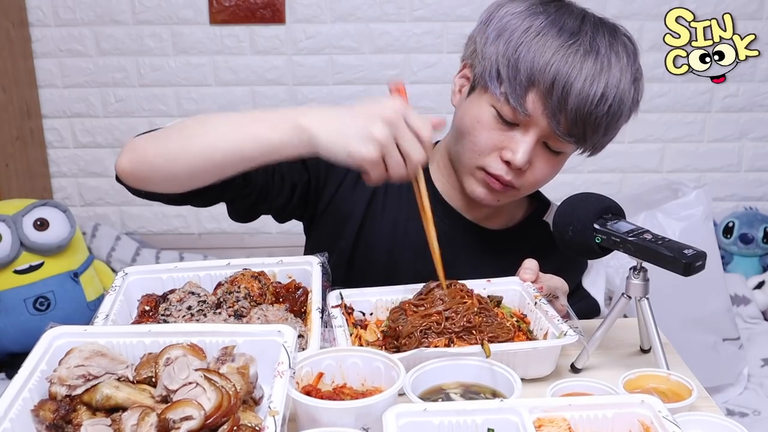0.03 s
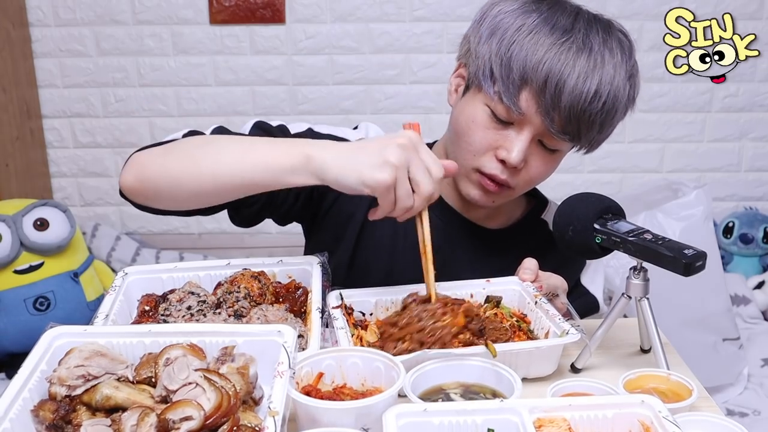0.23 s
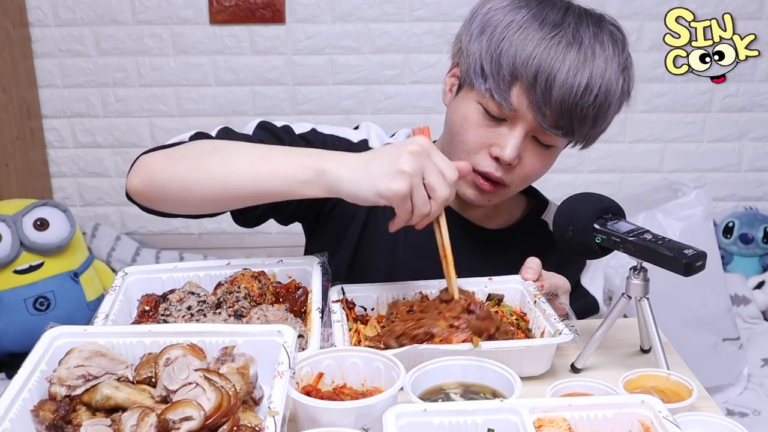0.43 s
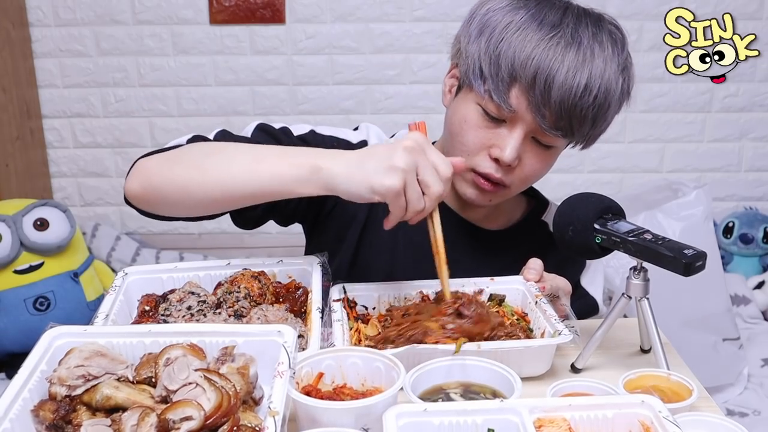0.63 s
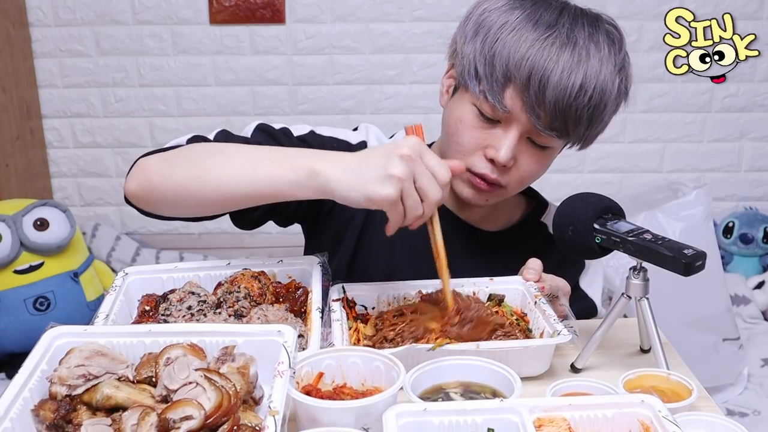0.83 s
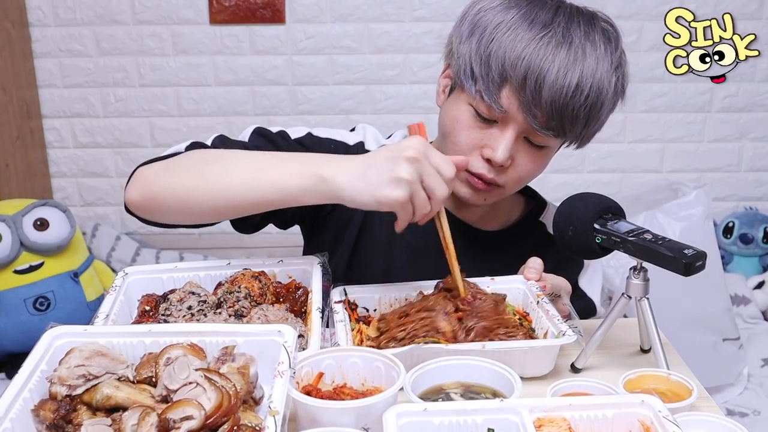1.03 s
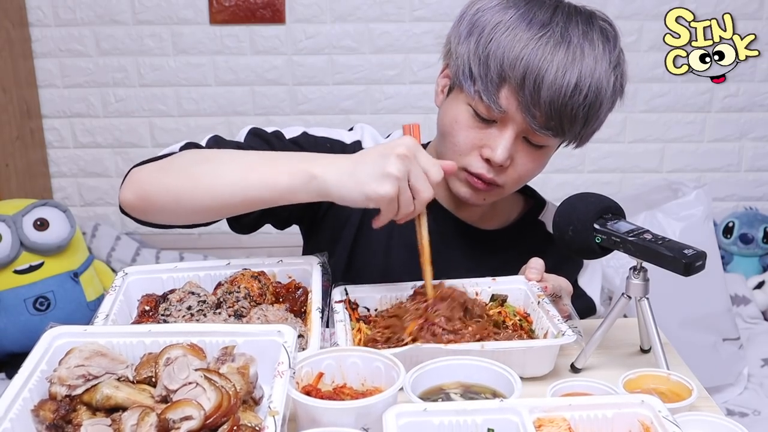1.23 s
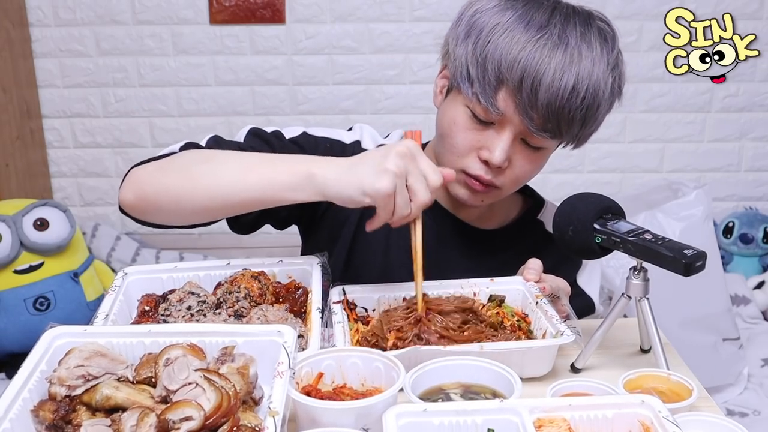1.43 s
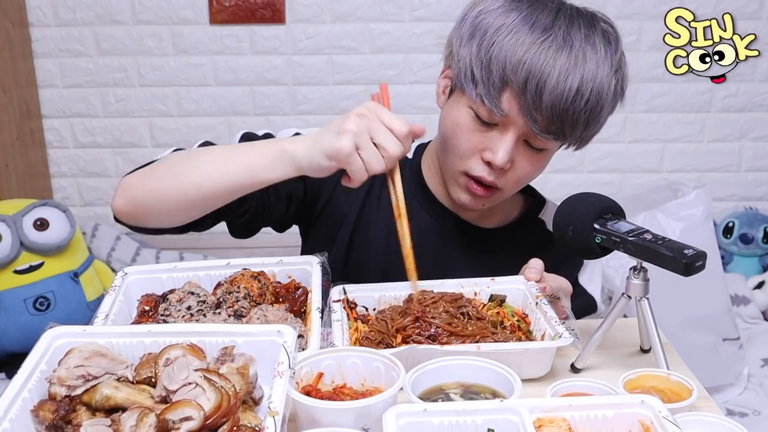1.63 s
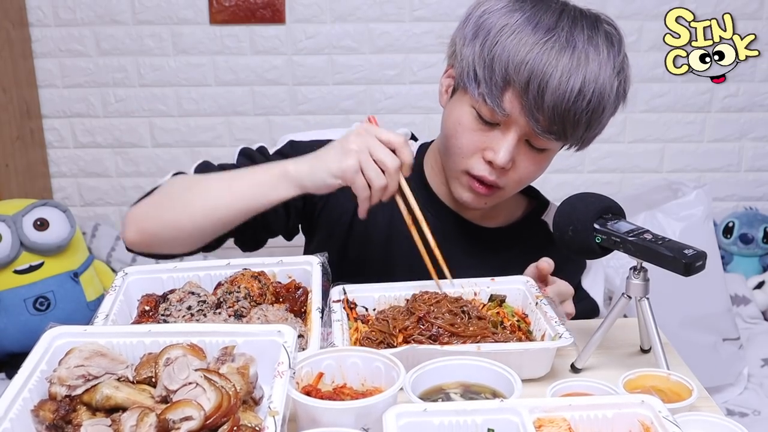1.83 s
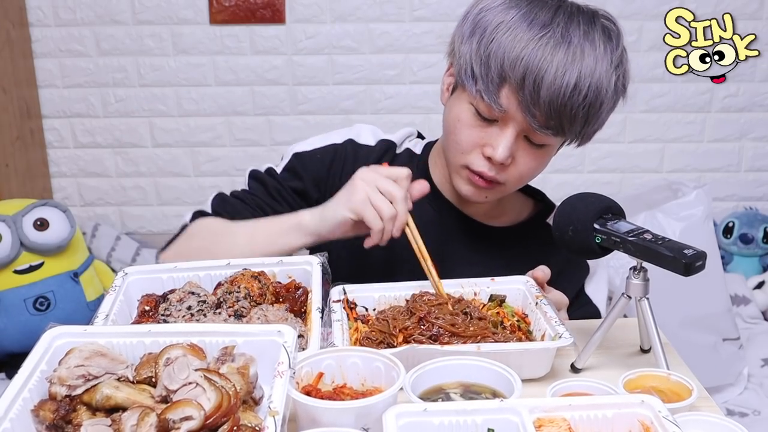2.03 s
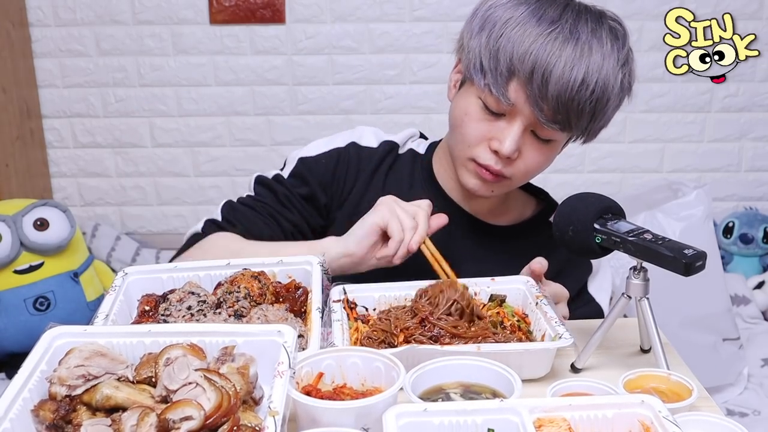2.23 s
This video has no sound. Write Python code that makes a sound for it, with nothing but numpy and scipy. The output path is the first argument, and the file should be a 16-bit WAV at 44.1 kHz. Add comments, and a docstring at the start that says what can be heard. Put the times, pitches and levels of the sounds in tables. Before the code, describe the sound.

Chopsticks stir sauced noodles with wet squelches and crackles, then click against a plastic tray.

```python
"""Chopsticks stirring sauced noodles

A thin plastic tray, close to a stereo microphone in a quiet room. Sauce films crackle, pop and
squelch as the strands part, in swarms of tiny chirping bursts. Pushes thud through the table and
rock the microphone stand, and the tray floor flexes with a hollow knock. Near the end the
chopsticks click against each other and the tray."""
import sys
import numpy as np
from scipy import signal
from scipy.fft import rfft, irfft, next_fast_len
from scipy.io import wavfile
from scipy.ndimage import map_coordinates

SR = 44100
rng = np.random.default_rng(int(sys.argv[2]) if len(sys.argv) > 2 else 0)


def wav_out(sig):
    """Save sig, one row per channel (or a flat mono array), as 16-bit PCM at SR to the path in sys.argv[1]."""
    wavfile.write(sys.argv[1], SR, np.round(np.clip(np.atleast_2d(sig).T, -1, 1) * 32767).astype(np.int16))


N = 101429
LEFT_LAG_S = 3e-5  # the tray's sound reaches the left capsule this much later


def amp(db):
    """Decibels to gain."""
    return 10 ** (np.asarray(db) / 20)


def unit(x):
    """Scale to rms 1."""
    return x / np.sqrt(np.mean(x ** 2) + 1e-20)


def along(points, hz):
    """Read (f/Hz, value) points on a log frequency axis."""
    f, v = np.transpose(points)
    return np.interp(np.log(hz + 1), np.log(f + 1), v)


def curves(rows):
    """One envelope for each column after the time."""
    times, *columns = np.transpose(rows)
    return [np.interp(np.arange(N) / SR, times, column) for column in columns]


def wobble(rate):
    """A smooth random curve, rate knots a second."""
    return map_coordinates(rng.standard_normal(2000), [np.arange(N) * rate / SR], mode="wrap")


def filtered(x, response):
    """Filter x by a response given as a function of frequency."""
    n = x.shape[-1]
    size = next_fast_len(n + 4096)
    return irfft(rfft(x, size) * response(np.fft.rfftfreq(size, 1 / SR)), size)[..., :n]


def bell(f, centre_hz, octaves):
    """A bell-shaped band around one pitch."""
    return np.exp(-.5 * (np.log2((f + 1) / centre_hz) / octaves) ** 2)


def coloured(x, eq):
    """x through an EQ curve, at rms 1."""
    return unit(filtered(x, lambda hz: amp(along(eq, hz))))


def noise(width):
    """White stereo noise; width is side over middle."""
    mid, side = rng.standard_normal((2, N))
    return unit(np.array([mid + width * side, mid - width * side]))


def panned(x, pan_db):
    """Left louder than right by pan_db."""
    return x * amp(np.array([[.5], [-.5]]) * pan_db)


def add(track, s, sound):
    """Mix a sound into the track at time s."""
    part = track[..., max(round(s * SR), 0):][..., :sound.shape[-1]]
    part += sound[..., :part.shape[-1]]


def attack(t, rise_s):
    """Exponential rise to 1."""
    return 1 - np.exp(-t / rise_s)


def fade(t, t60):
    """Exponential decay, 60 dB down at t60."""
    return np.exp(-np.log(1000) * t / t60)


def ring(modes, t):
    """Damped sines from (f/Hz, level/dB, t60/s) rows, balanced a little differently each time."""
    return sum(amp(db + rng.normal(0, 1)) * fade(t, t60) * np.sin(2 * np.pi * hz * t)
               for hz, db, t60 in modes)


def room_tone():
    """The quiet room's steady, wide bed of noise."""
    # room tone EQ: f/Hz, gain/dB
    bed_eq = [(20, 29.5), (100, -15), (200, -18), (500, 4.5), (1500, -9), (5000, -43), (10000, -60),
              (16000, -56)]
    return amp(-60.5) * coloured(noise(width=1.0), bed_eq)


def reverb(x):
    """The room's diffuse tail, different in each channel."""
    # room decay: f/Hz, t60/s
    decay = [(150, 0.45), (1000, 0.14), (5000, 0.3), (9000, 0.074), (16000, 0.36)]
    # tail EQ: f/Hz, gain/dB
    tail_eq = [(100, 9.5), (700, -6.5), (1400, 9), (5000, -8), (8000, -7), (14000, -18)]
    hz, t, spectrum = signal.stft(rng.standard_normal((2, SR // 2)), SR, nperseg=256)
    tail = signal.istft(spectrum * fade(t, along(decay, hz)[:, None]), SR, nperseg=256)[1]
    impulse = np.pad(tail, ((0, 0), (150, 0))) / np.linalg.norm(tail[0])  # 3.4 ms pre-delay
    wet = signal.fftconvolve(x, impulse, axes=1)[:, :N]
    return filtered(wet, lambda f: amp(along(tail_eq, f)))


def table_and_stand():
    """Pushes and drags shake the table; the rocking stand moves the capsules in opposite senses."""
    # pushes: t/s, relative thud level/dB, relative rocking level/dB, thud f/Hz
    pushes = [(0.405, -44, -31, 67.6), (.464, -36, -50, 96.5), (0.513, -35.5, -37, 88.7),
              (0.616, -50, -49, 100), (0.653, -47.5, -31.5, 96), (.755, -42.5, -31, 91),
              (0.961, -44.5, -31, 76), (1.05, -45.5, -46, 93.6), (1.167, -42, -30, 86.3),
              (1.238, -35.5, -23, 78.7), (1.381, -27.5, -24.5, 76), (1.465, -41.5, -27, 85.7),
              (1.494, -41, -30, 76), (1.63, -31.5, -29, 72.8), (1.712, -34, -31, 78.8),
              (1.873, -43, -39, 86.7), (2.273, -50.5, -40.5, 91.6)]
    # table top modes: multiple of the thud's pitch, level/dB, t60/s
    top_modes = [(1.002, 5.5, 0.13), (2.2, -4.5, 0.07)]
    # microphone stand modes: f/Hz, level/dB, t60/s
    stand_modes = [(46, 5, 0.1), (65.7, 10, 0.31), (440, 4, 0.032)]
    # chopsticks dragging on the tray floor: t/s, relative level/dB
    drag = [(0.0, -51), (0.11, -74.5), (0.2, -51.5), (0.38, -52), (0.49, -41), (0.57, -48), (1.13, -46.5),
            (1.25, -37.5), (1.3, -52.5), (1.39, -39.5), (1.45, -49), (1.48, -39), (1.58, -53.5),
            (1.62, -46), (1.82, -55), (2.08, -61), (2.19, -69.5), (2.3, -67)]
    # drag rumble EQ: f/Hz, gain/dB
    rumble_eq = [(15, 0.5), (45, -5), (65, -3.5), (100, 5.5), (145, -6.5), (185, -15), (260, -24),
                 (500, -36), (2000, -89)]
    sway_eq = [(15, -31), (48, -10), (66, 16), (88, -18), (600, -91)]  # stand resonance: f/Hz, gain/dB
    thud, rock, t = np.zeros(N), np.zeros(N), np.arange(SR // 2) / SR
    soft_onset = 1 - np.exp(-(t / 0.011) ** 2)
    for s, thud_db, rock_db, hz in pushes:
        modes = [(hz * multiple, db, t60) for multiple, db, t60 in top_modes]
        add(thud, s, amp(thud_db) * ring(modes, t) * attack(t, 0.0054))
        add(rock, s, amp(rock_db - 6.5) * ring(stand_modes, t) * soft_onset)
    drag_db, = curves(drag)
    rumble = amp(drag_db - 1.5) * coloured(noise(width=0.37), rumble_eq)
    rock += amp(drag_db + 4.0) * coloured(rng.standard_normal(N), sway_eq)
    return rumble + np.array([thud + rock, thud - rock])


def tray_flexes():
    """The thin tray floor gives way under the chopsticks with a dull, hollow knock."""
    # flexes: t/s, peak/dB
    knocks = [(0.679, -40.5), (.708, -45), (0.961, -54), (1.1606, -33), (1.229, -40), (1.383, -43.5),
              (1.858, -41.5), (1.869, -49), (1.956, -46.5), (2.079, -53)]
    # tray floor modes: f/Hz, level/dB, t60/s
    floor_modes = [(192, 4.5, 0.029), (349, 4.5, 0.022), (502, 3.5, 0.022), (830, -7, 0.023),
                   (1030, 4, 0.013)]
    out, t = np.zeros(N), np.arange(4096) / SR
    for s, db in knocks:
        knock = ring(floor_modes, t) * attack(t, 0.0089)
        add(out, s, amp(db) * knock / np.abs(knock).max())
    return out


def chopstick_clicks():
    """Each contact is a crack of noise and a brief ring of sticks and tray, with its own bright band."""
    # contacts: t/s, peak/dB, brightest f/Hz, t60/s
    clicks = [(1.8343, -40.5, 2920, 0.006), (1.8441, -24, 7600, 0.007), (1.8581, -39.5, 1320, 0.0095),
              (1.8608, -45, 8900, 0.016), (1.8737, -25, 4000, 0.0039), (1.8903, -32, 7500, 0.0038),
              (1.9405, -43, 2920, 0.011), (1.971, -39, 4430, 0.0038), (1.977, -34.5, 2670, 0.011),
              (1.9823, -24.5, 4900, 0.0045), (1.9847, -31.5, 1900, 0.011), (2.0011, -26.5, 1640, 0.0034),
              (2.0017, -16.5, 4680, 0.011), (2.0035, -22, 1420, 0.0069), (2.0178, -17, 6600, 0.0076)]
    # chopstick and tray modes: f/Hz, level/dB, multiple of the click's t60
    modes = [(1357, 2, 2.4), (1730, 4, 1.2), (2530, 10.5, 1.1), (3100, 8, 0.58), (4790, 17.5, 0.41),
             (5220, 17.5, 0.56), (12500, 2, 0.6)]
    low_cut_hz, skirt_db = 1000, -6
    out, t = np.zeros(N), np.arange(2048) / SR
    for s, db, bright_hz, t60 in clicks:
        def contact(f):
            """A bright peak on a broad skirt, with the lows cut."""
            skirt = amp(skirt_db) / (1 + (f / (2.54 * bright_hz)) ** 4)
            return (skirt + bell(f, bright_hz, octaves=0.28)) / (1 + (low_cut_hz / (f + 1)) ** 6)

        struck = [(hz, level + 20 * np.log10(contact(hz)), t60 * life) for hz, level, life in modes]
        tone = ring(struck, t)
        crack = filtered(rng.standard_normal(len(t)), contact) * fade(t, t60)
        click = (unit(tone) + unit(crack)) * attack(t, 0.00015)
        add(out, s, amp(db) * click / np.abs(click).max())
    return panned(out, pan_db=-4)


def sauce_pops():
    """A larger film tears with a snap and its pocket of air rings for a few cycles."""
    # bursting bubbles: t/s, peak/dB, f/Hz
    pops = [(.016, -46.5, 5470), (0.071, -59, 4630), (.153, -47, 6640), (.174, -55, 3340),
            (.234, -41.5, 5830), (.272, -40.5, 1860), (0.314, -41, 2200), (0.38, -38, 3240),
            (0.404, -37, 5900), (0.4472, -37.5, 1620), (.476, -34, 10700), (0.546, -36.5, 2300),
            (.622, -42, 1360), (.629, -41, 12000), (.642, -32.5, 7000), (.758, -37.5, 2130),
            (0.831, -38.5, 4400), (.848, -32, 4860), (0.8695, -34.5, 5570), (.898, -30, 5760),
            (0.9125, -36.5, 1435), (.9208, -33.5, 4500), (.938, -32.5, 6260), (0.975, -44, 3700),
            (0.989, -34.5, 2480), (1.054, -38.5, 5800), (1.0875, -34.5, 6020), (1.16, -36.5, 1500),
            (1.204, -35.5, 7350), (1.227, -37.5, 4000), (1.38, -30, 6350), (1.345, -41.5, 1760),
            (1.44, -39, 1540), (1.526, -39, 2040), (1.55, -33, 9300), (1.594, -42, 11000),
            (1.63, -32.5, 11800), (1.662, -31.5, 4880), (1.716, -37, 13000), (1.723, -55, 4500),
            (1.759, -51.5, 2180), (1.763, -40, 9200), (2.078, -42.5, 1220), (2.093, -46.5, 1330),
            (2.121, -38, 9000), (2.155, -43, 9400)]
    ring_cycles, snap_t60 = 11, 0.0083
    out, t = np.zeros(N), np.arange(2048) / SR
    for s, db, hz in pops:
        hiss = filtered(rng.standard_normal(len(t)), lambda f: bell(f, hz, octaves=0.47) + .08)
        snap = unit(hiss) * fade(t, snap_t60)
        pocket = ring([(hz, 0, ring_cycles / hz)], t)
        pop = (pocket + 0.28 * snap) * attack(t, 0.000092)
        add(out, s, amp(db) * pop / np.abs(pop).max())
    return panned(out, pan_db=1.5)


def bubbles(lo_hz, hi_hz, cycles, spread_db, rise, scatter, count, samples):
    """Tiny bursts in the sauce: rising chirps that swell and die, each from its own place in the tray."""
    when, pitch, life = rng.random((3, count, 1))
    strength, pan, lag = rng.standard_normal((3, count, 1))
    hz = (np.sqrt(lo_hz) + pitch * (np.sqrt(hi_hz) - np.sqrt(lo_hz))) ** 2
    t60 = cycles * (.5 + life) / hz
    gain = amp(spread_db * np.minimum(strength, 2)) * hz ** 1.36
    index = ((when * N).astype(int) + np.arange(samples)).ravel()
    out = []
    for side in (-.5, .5):
        # scatter spreads the arrival times between the capsules
        t = np.maximum(np.arange(samples) / SR + side * lag * scatter * LEFT_LAG_S, 0)
        swell = attack(t, 1 / hz) * fade(t, t60)
        chirp = np.sin(2 * np.pi * hz * t * (1 + rise * np.minimum(t / t60, 1)))
        burst = gain * amp(side * pan * 7.3) * swell * chirp
        out.append(np.bincount(index, burst.ravel(), N + samples)[:N])
    return unit(np.array(out))


def sauce_squishes():
    """Sauce squeezed between strands: a dense froth that swells and sinks around one pitch."""
    # squishes: t/s, length/s, level/dB, f/Hz
    squishes = [(0.395, 0.022, -58.5, 5600), (0.442, 0.097, -54, 1250), (0.52, 0.038, -54, 5600),
                (0.905, 0.04, -54, 5100)]
    out, t = np.zeros((2, N)), np.arange(N) / SR
    for s, length, db, hz in squishes:
        froth = bubbles(hz / 2, hz * 2, cycles=17, spread_db=2.5, rise=0.04, scatter=0.2,
                        count=2500, samples=400)
        froth = filtered(froth, lambda f: bell(f, hz, octaves=0.27))
        swell = np.sin(np.pi * np.clip((t - s) / length, 0, 1))
        out += amp(db) * unit(froth) * swell
    return out


def noodles():
    """Parting strands fizz, crackle and squelch in clumps over a low churn: bursts in a wet smear."""
    # stirring envelopes, trimmed per layer below: t/s, fizz/dB, crackle/dB, squelch/dB, churn/dB
    stir = [(0.0, -75.5, -84, -73, -78), (0.08, -79, -73, -75, -60.5), (0.12, -89, -87.5, -84.5, -76),
            (0.2, -68.5, -65.5, -64, -70.5), (0.255, -67.5, -64, -62.5, -65),
            (0.29, -63.5, -53.5, -58, -65), (0.35, -68.5, -61.5, -63.5, -68),
            (0.41, -62.5, -54.5, -59, -61), (0.49, -61.5, -58.5, -53.5, -49),
            (0.58, -62, -59.5, -64.5, -63.5), (0.67, -59.5, -56.5, -58, -60),
            (0.75, -63.5, -57, -61.5, -59.5), (0.81, -65, -62.5, -58.5, -62),
            (0.88, -70, -63.5, -63.5, -64.5), (0.93, -56.5, -55.5, -62.5, -60.5),
            (1.03, -64.5, -61.5, -57.5, -57), (1.11, -64, -60.5, -58, -62.5),
            (1.17, -57.5, -51.5, -60, -46.5), (1.24, -61, -55.5, -55.5, -66), (1.28, -66, -57.5, -64, -56),
            (1.35, -63.5, -56.5, -61, -66), (1.43, -57, -53, -60.5, -51),
            (1.53, -64.5, -56.5, -56.5, -50.5), (1.6, -71, -58, -58.5, -64.5), (1.67, -61, -54.5, -62, -57),
            (1.72, -68.5, -69.5, -70.5, -63), (1.81, -84.5, -71, -71.5, -70.5),
            (1.87, -71, -66, -67, -55.5), (1.93, -74, -72.5, -69.5, -69), (2.04, -60.5, -59, -73, -64.5),
            (2.1, -76, -63.5, -66.5, -57.5), (2.14, -74, -64, -72, -70), (2.19, -85, -85, -85, -87),
            (2.24, -81.5, -76, -79.5, -69.5), (2.3, -70, -66.5, -68, -70)]
    # airy fizz EQ: f/Hz, gain/dB
    fizz_eq = [(4000, -2.5), (7300, -3), (9000, 1.5), (12000, -4.5), (14000, -10.5), (16000, -18.5)]
    # crisp crackle EQ: f/Hz, gain/dB
    crackle_eq = [(1500, -6.5), (2600, -3), (3600, -6), (5200, -3.5), (6800, -9), (9000, -12.5),
                  (16000, -64)]
    # midrange squelch EQ: f/Hz, gain/dB
    squelch_eq = [(200, -60), (450, -1.5), (800, 2), (1400, -0.5), (2100, 0.5), (2700, -9), (4200, -7),
                  (12000, -79)]
    # low churn EQ: f/Hz, gain/dB
    churn_eq = [(40, -47), (110, -49), (190, 6.5), (300, -3), (480, -7), (700, -15.5), (1300, -26.5),
                (5000, -92)]
    smear, clump_db, flicker_db, squelch_clump_db = .42, 1.6, 1.6, 3.1
    fizz_db, crackle_db, squelch_db, churn_db = curves(stir)
    clumps = unit(wobble(130) + 1.7 * wobble(41.46))
    tiny = bubbles(6570, 15800, cycles=19, spread_db=5.3, rise=0.028, scatter=0.66,
                   count=6000, samples=160)
    fine = bubbles(2075, 7600, cycles=19, spread_db=5.3, rise=0.064, scatter=0.1,
                   count=5000, samples=360)
    medium = bubbles(567, 3870, cycles=7.1, spread_db=-0.5, rise=0.014, scatter=0.39,
                     count=3000, samples=700)
    deep = bubbles(145.3, 1180, cycles=4.34, spread_db=1.5, rise=0.03, scatter=9.1,
                   count=900, samples=1400)
    flicker = amp(clump_db * clumps + flicker_db * wobble(59.1))
    fizz = flicker * coloured(tiny + smear * noise(0.14), fizz_eq)
    crackle = amp(clump_db * clumps) * coloured(fine + smear * noise(0.19), crackle_eq)
    squelch = amp(squelch_clump_db * clumps) * coloured(medium + smear * noise(0.23), squelch_eq)
    churn = coloured(deep + 2 * noise(3.7), churn_eq) * amp(churn_db - 0.55)
    sauce = (unit(fizz) * amp(fizz_db + 4.0)
             + unit(crackle) * amp(crackle_db + 1.3)
             + unit(squelch) * amp(squelch_db + 1.34))
    return panned(sauce, pan_db=1.64) + panned(churn, pan_db=-5.0)


def scene():
    """The tray, slightly nearer the right capsule, over faint reverb, table thuds and room tone."""
    tray = noodles() + sauce_squishes() + sauce_pops() + tray_flexes() + chopstick_clicks()
    delay_s = LEFT_LAG_S * np.array([[.5], [-.5]])
    tray = filtered(tray, lambda hz: np.exp(-2j * np.pi * hz * delay_s))
    return tray + amp(-15) * reverb(tray) + table_and_stand() + room_tone()


def record(dry):
    """A steep low-pass takes off the very top."""
    top_hz = 16200
    return filtered(dry, lambda hz: 1 / np.sqrt(1 + (hz / top_hz) ** 120))


dry = scene()
out = record(dry)
wav_out(out)
```